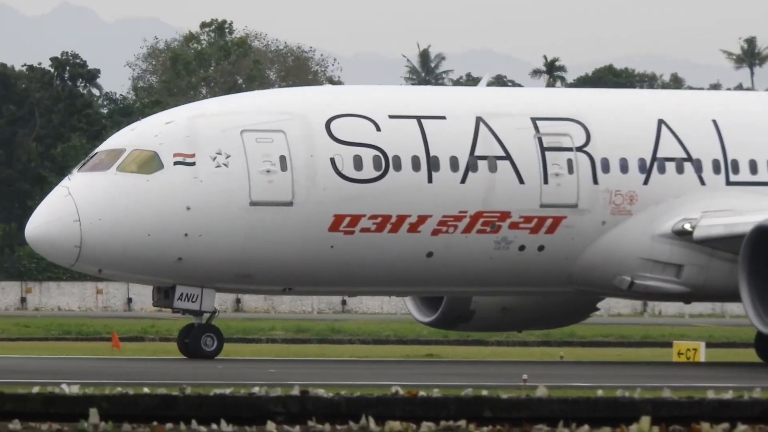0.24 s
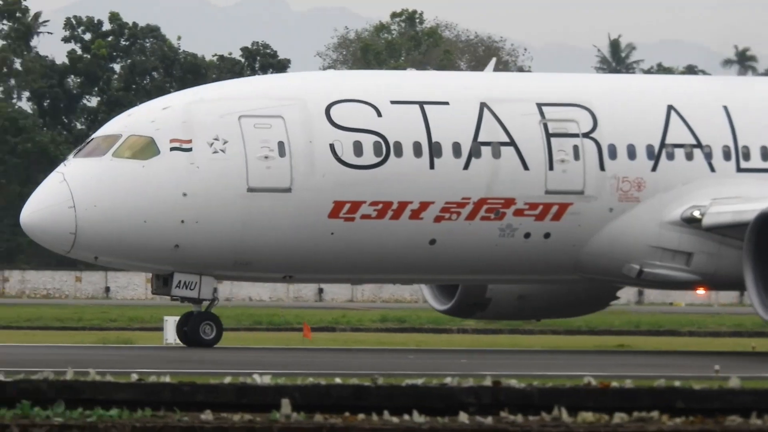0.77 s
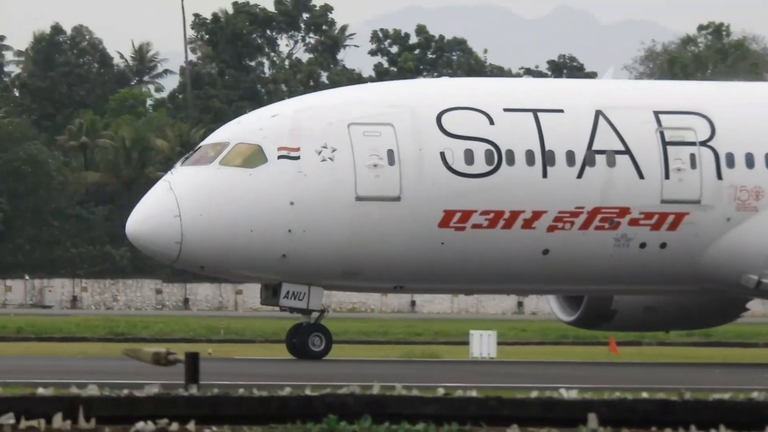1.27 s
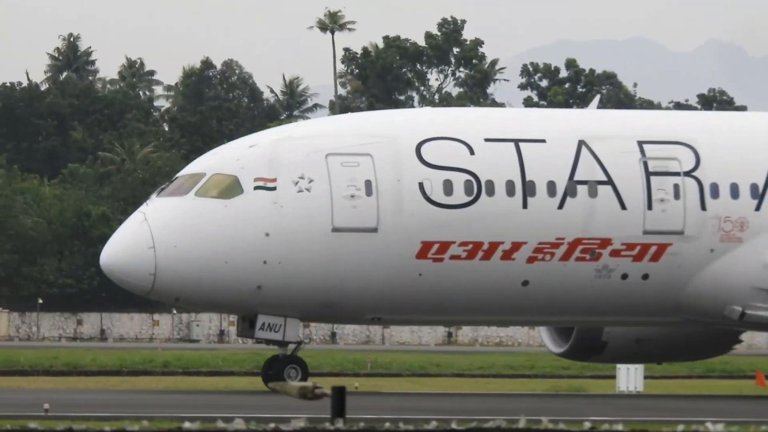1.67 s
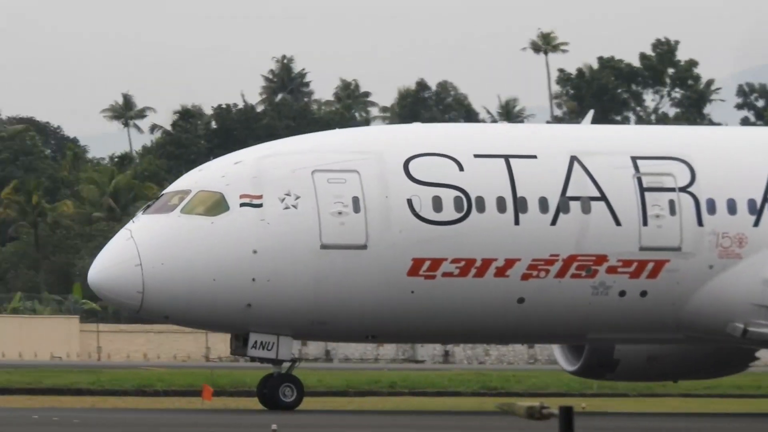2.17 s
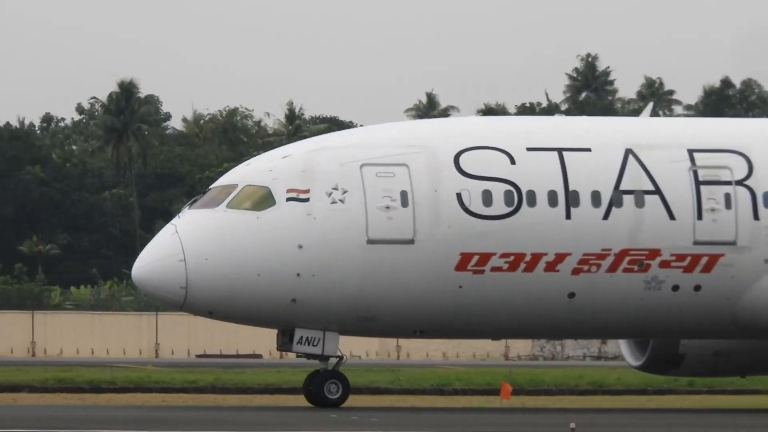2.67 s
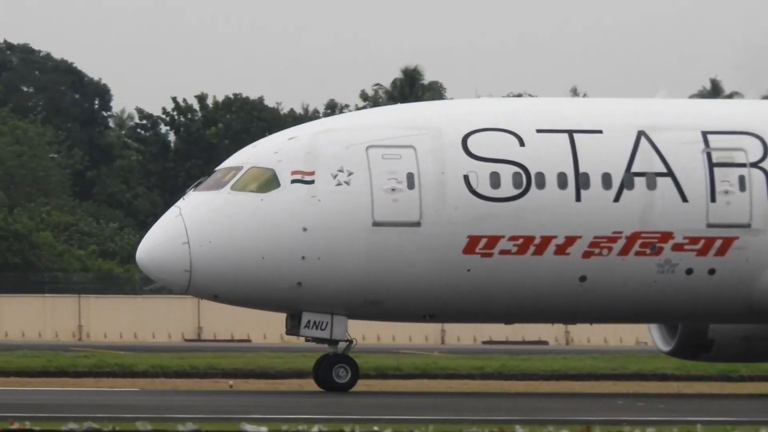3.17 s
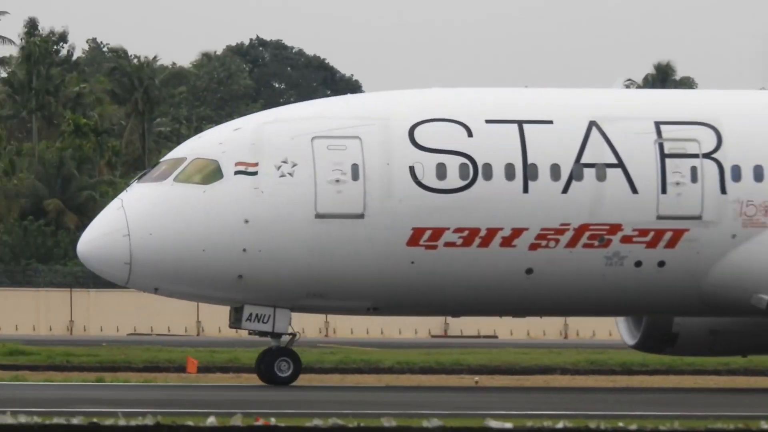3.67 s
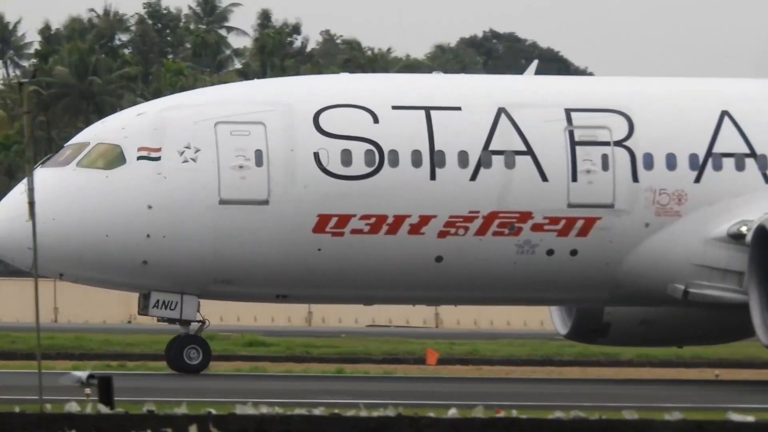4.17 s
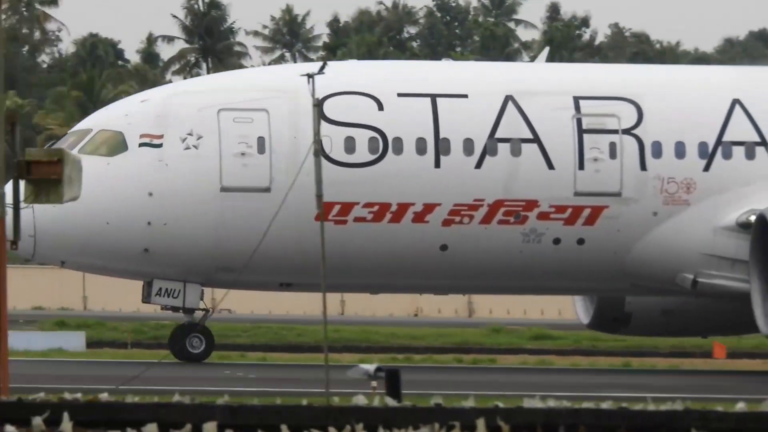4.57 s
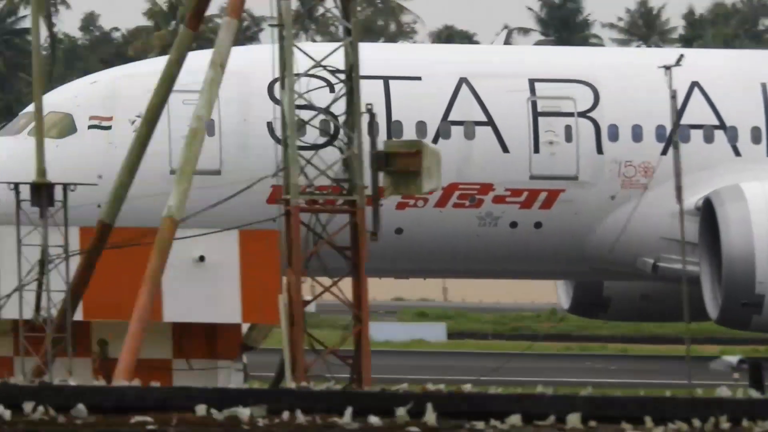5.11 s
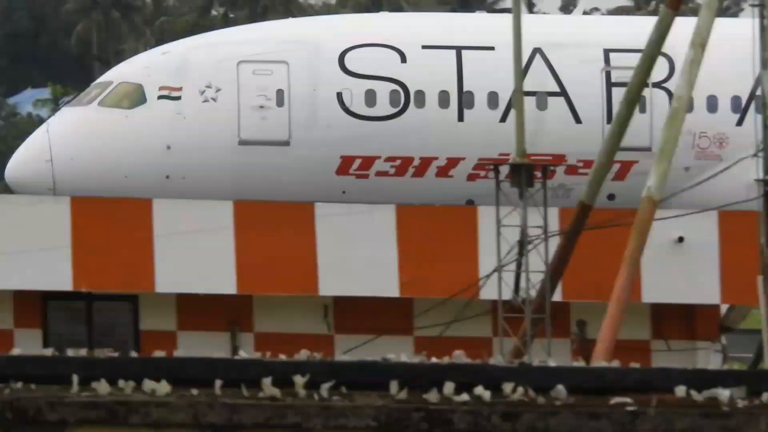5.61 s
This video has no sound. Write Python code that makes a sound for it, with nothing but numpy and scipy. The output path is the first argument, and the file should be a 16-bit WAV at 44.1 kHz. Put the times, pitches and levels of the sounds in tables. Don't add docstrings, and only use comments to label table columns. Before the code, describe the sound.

Outdoors across an airfield, a big jet airliner powers up. Low rumble and wavering hiss come first, with thin high whistles sliding down. Around one second the rumble throbs and swells, then a layered fan whine climbs, shimmers and levels off, while hiss and rumble continue. A small camera hears it from a distance; hiss is much brighter on the right.

```python
import sys
import numpy as np
from scipy import signal
from scipy.fft import rfft, irfft, next_fast_len
from scipy.io import wavfile
from scipy.ndimage import uniform_filter1d, map_coordinates

SR = 44100
rng = np.random.default_rng(int(sys.argv[2]) if len(sys.argv) > 2 else 0)


def decibels_to_gain(level_db):
    exponent = np.asarray(level_db, float) / 20
    return 10 ** exponent


def output_pcm(signal):
    pcm = np.clip(np.atleast_2d(signal).T, -1, 1) * 32767
    wavfile.write(sys.argv[1], SR, np.round(pcm).astype(np.int16))


N = 257984
T = np.arange(N) / SR
M = next_fast_len(N)
HZ = np.fft.rfftfreq(M, 1 / SR)

# [t/s, rumble level/dB, roar level/dB]
JET_LEVELS = [(0, -29.5, -43.5), (.5, -29, -42), (.95, -27.5, -38), (1.1, -25.5, -39), (1.6, -24, -38.5),
              (1.9, -26.5, -47.5), (2.1, -25.5, -44.5), (2.7, -27.5, -45), (3.4, -31.5, -47),
              (3.9, -27, -44), (4.4, -25.5, -42.5), (5.0, -25, -37), (5.5, -24.5, -39), (5.85, -28, -40)]


def on_log(hz, table, axis=1):
    rows = np.array(table, float)
    return np.interp(np.log(np.maximum(hz, 1)), np.log(rows[:, 0]), rows[:, axis])


def curves(table):
    s, *columns = np.transpose(table)
    return [np.interp(T, s, column) for column in columns]


def walk(rate):
    knots = rng.standard_normal(int(T[-1] * rate) + 2)
    return map_coordinates(knots, [T[::64] * rate], order=2).repeat(64)[:N]


def arch(at, length):
    return np.cos(np.pi / 2 * np.clip(2 * (T - at) / length, -1, 1))


def noise_band(centre_hz, width_hz):
    bell = np.exp(-.5 * ((HZ - centre_hz) / width_hz) ** 2)
    band = irfft(rfft(rng.standard_normal(M)) * bell, M)[:N]
    return band / band.std()


def turbulence(colour, levels_db, centres_hz, shared_db, own_db, own_rate):
    swing = [db - 10 * np.log10(np.mean(decibels_to_gain(db) ** 2)) for db in levels_db]
    noise = rfft(rng.standard_normal((2, M))) * decibels_to_gain(on_log(HZ, colour)) * np.sqrt(SR / 2)
    lo, hi = colour[0][0], colour[-1][0]
    place = 3 * np.log2(np.maximum(HZ, 1) / lo)
    centres = 3 * np.log2(np.array(centres_hz) / lo)
    out, near = 0, walk(9)
    for k in range(int(3 * np.log2(hi / lo)) + 2):
        band = np.cos(np.pi / 2 * np.clip(place - k, -1, 1)) ** 2
        share = [np.interp(k, centres, one) for one in np.eye(len(swing))]
        near = 0.86 * near + 0.45 * walk(9)
        db = np.dot(share, swing) + shared_db * near + own_db * walk(own_rate)
        out = out + decibels_to_gain(db) * irfft(noise * band, M)[:, :N]
    return out


def jet():
    # [f/Hz, level/dB per Hz]
    jet_colour = [(20, -58), (45, -57), (65, -46), (95, -43), (130, -48.5), (190, -54.5), (260, -65),
                  (450, -70.5)]
    throb = noise_band(97, 8) * decibels_to_gain(-24.5) * np.sqrt(arch(1.48, 1.05).clip(0))
    return turbulence(jet_colour, curves(JET_LEVELS), [150, 300], 1.0, 1.22, 7) + throb


def fan():
    # [t/s, level/dB]
    air = [(0.0, -23), (0.34, -23.5), (0.44, -18), (0.94, -18.5), (1.79, -14.5), (2.15, -23.5),
           (2.33, -18.5), (2.64, -22.5), (2.75, -16.5), (2.85, -20), (3.18, -23), (3.19, -23),
           (3.63, -24.5), (3.66, -27.5), (4.76, -20.5), (5.56, -21.5), (5.65, -21.5), (5.85, -24)]
    # [f/Hz, level/dB per Hz]
    fan_colour = [(450, -72), (640, -58.5), (800, -68), (1150, -66.5), (1350, -72), (2000, -62.5),
                  (2400, -60), (3200, -66.5), (4300, -53), (5400, -52.5), (6100, -60), (7600, -48),
                  (9100, -62), (10300, -74)]
    # [t/s, length/s, level/dB]
    gusts = [(.1, 0.16, 0), (0.686, 0.18, 1), (1.24, 0.23, 2), (1.607, 0.062, 2.5), (2.328, 0.15, 2.5),
             (2.738, 0.056, 0.5), (3.021, 0.15, 2.5), (3.147, 0.071, 4), (3.44, 0.13, 1.5),
             (3.604, 0.13, 4.5), (4.236, 0.11, 3.5), (4.81, .12, 2.5), (5.268, 0.061, 3),
             (5.655, 0.21, 3.5)]
    air_db, = curves(air)
    roar_db = curves(JET_LEVELS)[1]
    gust_db = sum(db * arch(at, length) ** 2 for at, length, db in gusts)
    hump_db = 0.26 * roar_db + np.interp(T, (3.6, 4.7), (0, 6.5))
    middle_db = 0.47 * roar_db + 0.39 * air_db
    top_db = air_db + 1.63 * gust_db + 0.24 * T
    levels = [hump_db, middle_db, middle_db, air_db + gust_db, top_db]
    return turbulence(fan_colour, levels, [640, 900, 1800, 4300, 7400], .6, .6, 18)


def compressor():
    # [t/s, start f/Hz, fall/Hz per s, length/s, level/dB]
    whistles = [(.0, 9690, 500, .072, -34), (.1, 9850, 928, .24, -29), (.1, 9520, 700, .14, -36),
                (.37, 9850, 1020, .27, -29), (.66, 9850, 900, .16, -30), (.87, 9830, 850, .11, -30),
                (.88, 9530, 600, .12, -35), (1.0, 9740, 400, .08, -35), (1.08, 9800, 500, .063, -32),
                (1.12, 9490, 200, .09, -36), (1.26, 9810, 200, .06, -33), (1.5, 9340, 200, .07, -37)]
    core_db = -27 - 2.5 * T + 1.2 * walk(5)
    out = noise_band(9700, 230) * decibels_to_gain(core_db) * np.clip((2.1 - T) / .8, 0, 1)
    quiver = walk(28.9)
    for start, hz, fall, length, db in whistles:
        span = slice(int(start * SR) + 1, int((start + length) * SR))
        age = T[span] - start
        swell = np.abs(np.sin(np.pi * age / length)) ** .5 * decibels_to_gain(db + 7 + 3 * quiver[span])
        cycles = hz * age - fall * age ** 2 / 2
        out[span] += swell * np.sin(2 * np.pi * cycles + .8 * quiver[span])
    return out


def blades():
    # [t/s, blade rate f/Hz]
    spool_up = [(.9, 417), (1.3, 489), (1.6, 528.9), (1.85, 555.4), (2.1, 573), (2.4, 589.5), (2.7, 599),
                (3.0, 615), (3.4, 626), (3.9, 638.4), (4.5, 647.7), (5.85, 657.2)]
    low_db = [-49, -56.5]
    # [t/s, length/s, order 1 level/dB, order 2 level/dB]
    low_swells = [(1.74, .3, -50, -50), (2.55, 1.1, -54, -45), (2.13, .1, -37, -46), (2.3, .3, -33, -44),
                  (2.62, .14, -34, -42), (2.8, .12, -40, -43), (2.99, .16, -36, -45), (3.35, .55, -32, -50),
                  (3.68, .12, -39, -58), (4.4, .3, -36, -58), (4.6, .2, -37, -58), (4.92, .25, -36, -58),
                  (5.15, .3, -35, -58), (5.45, .4, -40, -60)]
    upper_db = [-49, -48, -49, -50, -42, -38, -38, -40, -38, -33, -31, -42, -55]
    # [t/s, level/dB]
    upper_swell = [(.9, -26), (1.4, -2), (1.8, 4), (3.1, 5), (3.5, -1), (5.85, -14.5)]
    # [t/s, order, length/s, level/dB]
    flares = [(1.71, 5, .3, -33), (1.77, 8, .2, -18), (1.81, 7, .15, -29), (1.81, 9, .16, -21),
              (1.83, 4, .29, -34), (1.85, 15, .09, -24), (1.96, 8, .11, -26), (2.23, 13, .1, -20),
              (2.31, 6, .24, -34), (2.36, 13, .18, -17), (2.44, 9, .31, -21), (2.58, 12, .11, -25),
              (2.74, 9, .25, -21), (2.76, 8, .15, -20), (2.81, 4, .23, -32), (2.81, 12, .09, -21),
              (2.91, 7, .3, -30), (2.92, 12, .09, -22), (2.95, 13, .3, -25), (3.02, 11, .31, -22),
              (3.1, 12, .23, -14), (3.31, 12, .08, -23), (3.44, 12, .11, -22), (4.25, 7, .4, -28),
              (4.9, 7, .5, -29), (4.65, 12, .1, -22), (4.76, 11, .36, -22), (5.22, 8, .4, -28),
              (5.4, 7, .4, -30), (5.67, 8, .25, -26)]
    hz, = curves(spool_up)
    turn = 2 * np.pi * np.cumsum(uniform_filter1d(hz, SR // 5)) / SR
    swell_db, = curves(upper_swell)
    size = []
    for column, db in zip((2, 3), low_db):
        size.append(decibels_to_gain(db) + sum(decibels_to_gain(row[column]) * arch(*row[:2]) for row in low_swells))
    size += [decibels_to_gain(db + swell_db + 2 * walk(7)) for db in upper_db]
    for at, order, length, db in flares:
        size[int(order) - 1] += decibels_to_gain(db - 3) * arch(at, length)
    stirred = np.interp(T, (3.6, 4.3), (0, .35))
    out = 0
    for order, level in enumerate(size, 1):
        scatter = np.minimum(.12 + .6 * np.log2(order) + stirred, .78)
        rate = 45 + 10 * order
        scattered = walk(rate) + 1j * walk(rate)
        ray = np.sqrt(1 - scatter) + np.sqrt(scatter / 1.4) * scattered
        out = out + level * np.imag(ray * np.exp(1j * order * turn))
    return np.sqrt(2) * out * np.clip((T - 1.1) / .7, 0, 1)


def scene():
    # [f/Hz, level/dB, likeness 0-1]
    shadow = [(28, .5, .75), (60, 2, .99), (150, 2, .99), (320, 1.5, .58), (600, 1.5, .92), (900, .5, .62),
              (1700, 0, .72), (2020, -.5, .93), (2400, -10, .7), (3200, -7.5, .42), (4400, -15.5, .82),
              (5400, -21, .7), (6400, -19, .4), (7600, -42, .12), (8400, -33, .12), (9700, -27, .12)]
    # [f/Hz, phase/rad]
    port_phase = [(0, 0), (1550, -1.8), (2070, -3.0), (2760, -3.1), (3100, -2.7), (3700, -4.2),
                  (3960, -3.9), (5000, -5.6), (5770, -5.8), (6630, -7.7), (7060, -7.6), (9040, -5.2),
                  (9820, -3.4), (10900, -7.5)]
    direct, scattered = jet() + fan()
    tones = compressor() + blades()
    like = np.clip(on_log(HZ, shadow, axis=2), 0, 1)
    lag = np.exp(1j * np.interp(HZ, *np.transpose(port_phase)))
    heard = rfft(tones, M) + like * rfft(direct, M) + np.sqrt(1 - like ** 2) * rfft(scattered, M)
    left = irfft(decibels_to_gain(on_log(HZ, shadow)) * lag * heard, M)[:N]
    return np.array([left, direct + tones])


def drop_weak_bands(x):
    # [f/Hz, left level/dB per Hz, right level/dB per Hz]
    audible = [(1000, -84, -84), (1400, -77, -76), (2000, -76, -72), (3300, -80, -73), (5000, -84, -78),
               (7500, -86, -80), (9200, -87, -80), (10100, -86, -78), (10400, -80, -77), (16000, -80, -77)]
    # [low f/Hz, high f/Hz, level/dB per Hz]
    cancel = (1920, 2060, -76.5)
    hz, s, z = signal.stft(x, SR, window="cosine", nperseg=2048, noverlap=1024)
    edges = np.r_[0:192:4, 192:1024:8]
    width = np.diff(np.r_[edges, len(hz)])
    bin_hz = 13
    per_hz = np.add.reduceat(np.abs(z) ** 2, edges, axis=1) / width[:, None] / bin_hz
    limit_db = np.array([on_log(hz[edges], audible, axis=side) for side in (1, 2)])[:, :, None]
    busy_db = np.interp(s, (1.5, 2), (2.5, -1.5))
    loud_db = 10 * np.log10(per_hz[:, 20:].mean(axis=1, keepdims=True) + 1e-20)
    busy_db = busy_db + .6 * (loud_db - loud_db.mean(axis=2, keepdims=True))
    waver_db = 2.5 * rng.standard_normal(per_hz[:, :1].shape) + 2 * rng.standard_normal(per_hz.shape)
    keep = per_hz > decibels_to_gain(limit_db + busy_db + waver_db) ** 2
    keep[:, hz[edges] < audible[0][0]] = True
    inside = (hz > cancel[0]) & (hz < cancel[1])
    shared = z[:, inside].mean(axis=0)
    shared_per_hz = np.mean(np.abs(shared) ** 2, axis=0) / bin_hz
    z[:, inside] -= shared * (shared_per_hz < decibels_to_gain(cancel[2] + busy_db[1, 0] + waver_db[0, 0]) ** 2)
    z = z * np.repeat(keep, width, axis=1)
    return signal.istft(z, SR, window="cosine", nperseg=2048, noverlap=1024)[1][:, :N]


def haze():
    noise = rfft(rng.standard_normal((2, M)))
    high, wide = (irfft(noise * (HZ > lo) * (HZ < 15400), M)[:, :N] for lo in (12900, 11100))
    late = np.clip(T - 1.5, 0, 1)
    mix = (1 - late) * high / high.std() + late * decibels_to_gain(-7) * wide / wide.std()
    return mix * decibels_to_gain(-78 + 4 * walk(22))


def band_limit(x):
    return signal.sosfilt(signal.butter(12, 15700, fs=SR, output="sos"), x)


def record(dry):
    narrow = np.exp(-.5 * ((HZ - 3700) / 280) ** 2)
    echo_s = .01007
    comb = decibels_to_gain(-2.5 * narrow) * (1 + .55 * narrow * np.exp(-2j * np.pi * HZ * echo_s))
    top = decibels_to_gain(np.interp(HZ, (10250, 10400, 10950, 11080, 12000, 15500), (0, -4, -3, -18, -30, -45)))
    rounded = 1.3 * np.tanh(dry / 1.3)
    filtered = irfft(rfft(rounded, M) * comb * top, M)[:, :N]
    return band_limit(drop_weak_bands(filtered) + haze())


dry = scene()
out = record(dry)
output_pcm(out)
```